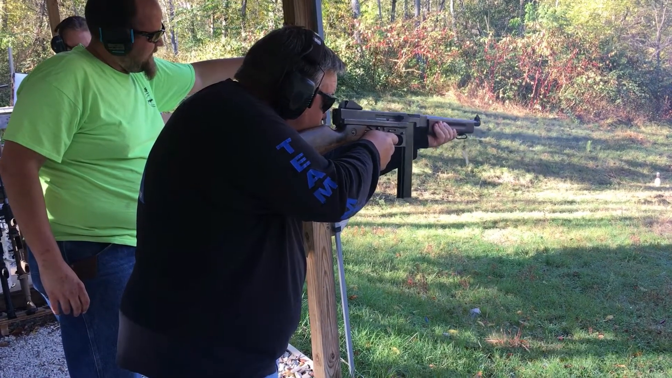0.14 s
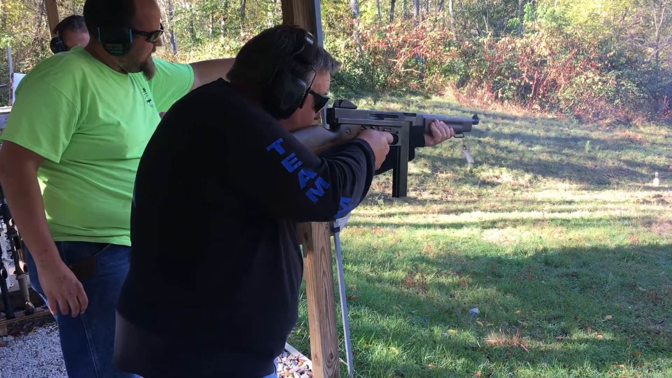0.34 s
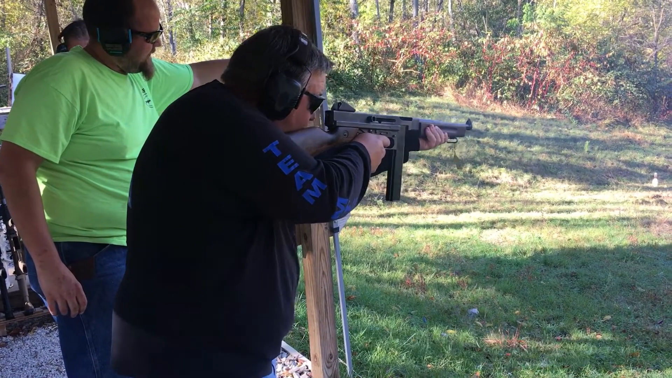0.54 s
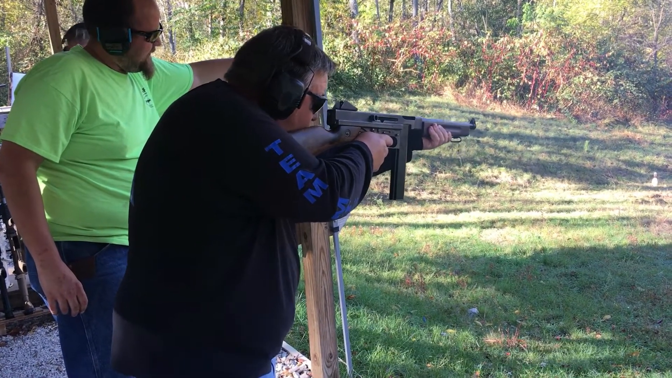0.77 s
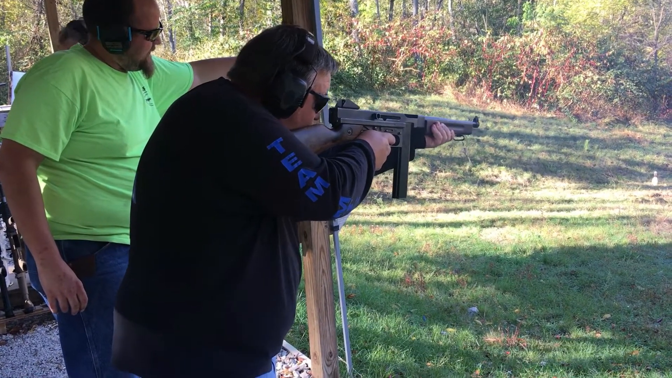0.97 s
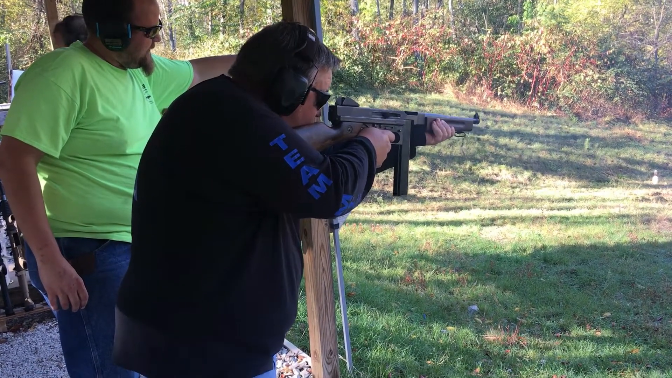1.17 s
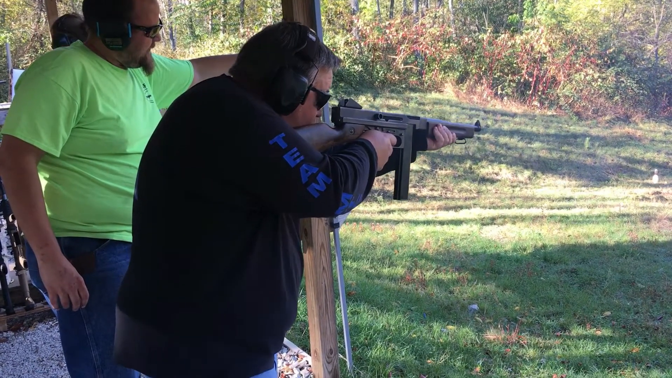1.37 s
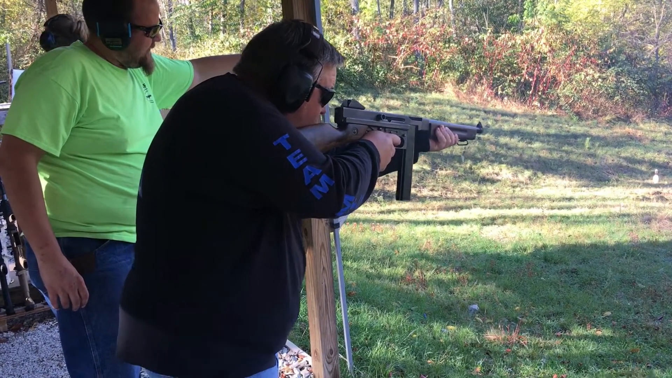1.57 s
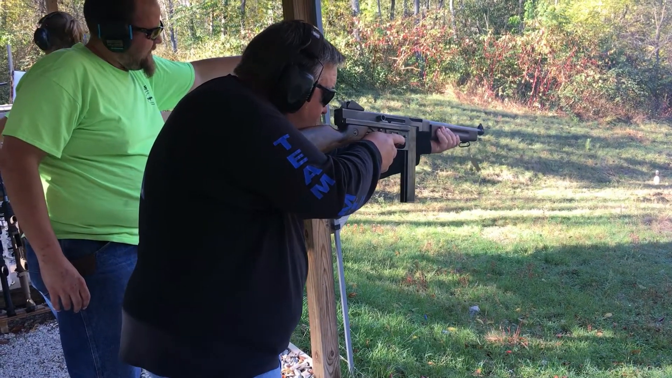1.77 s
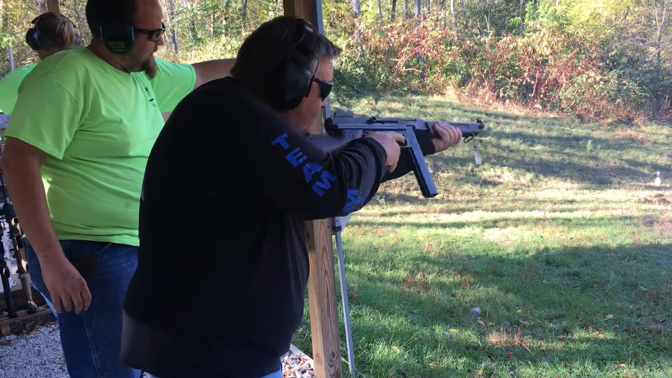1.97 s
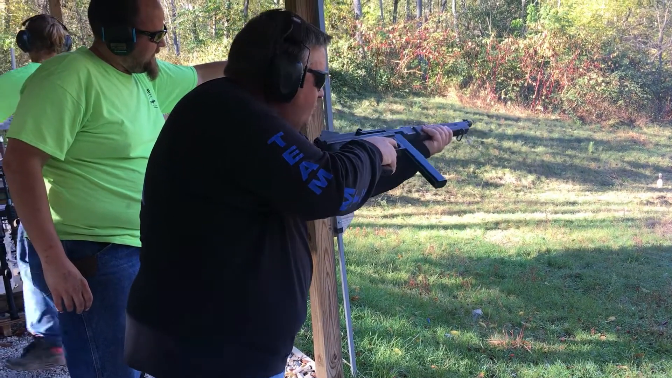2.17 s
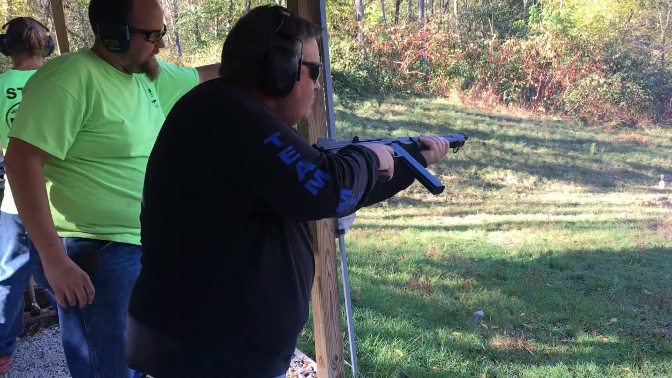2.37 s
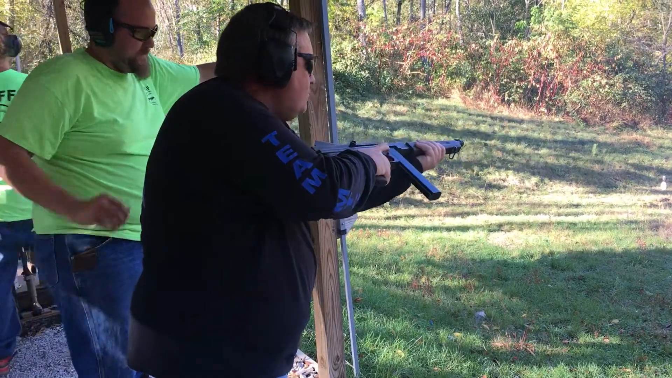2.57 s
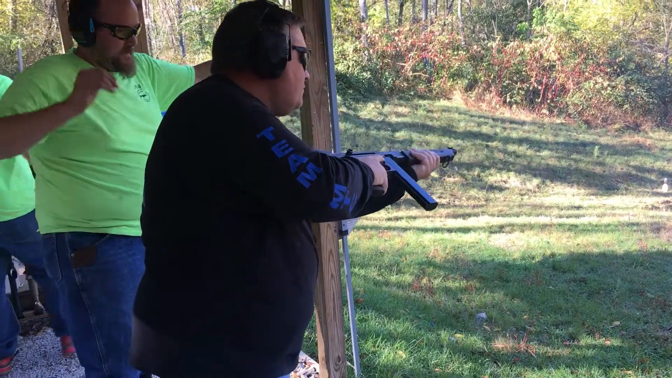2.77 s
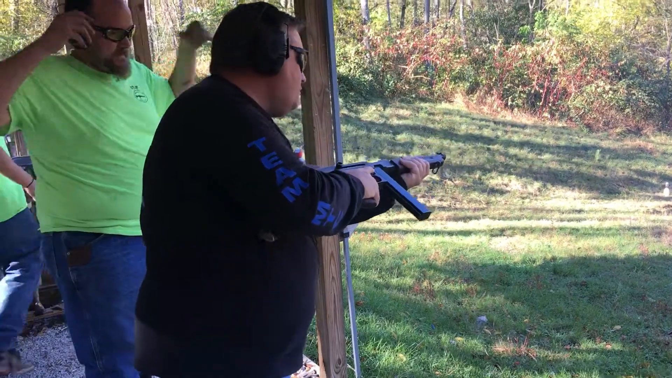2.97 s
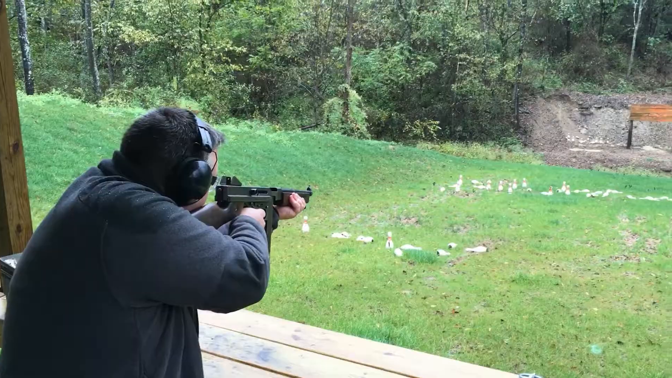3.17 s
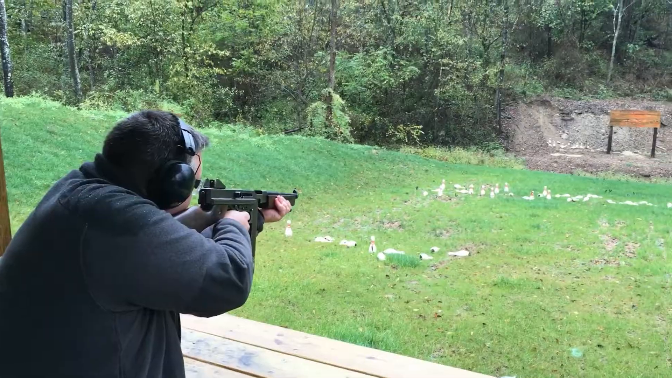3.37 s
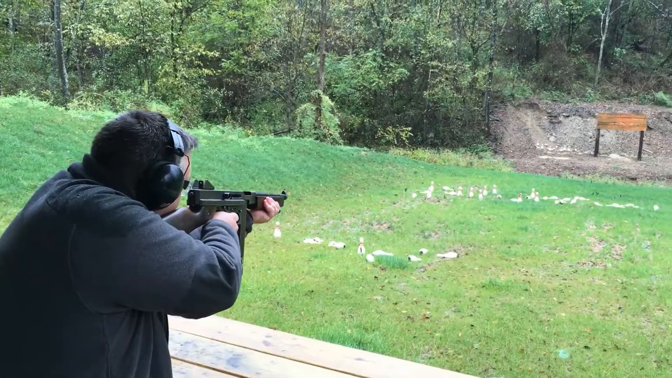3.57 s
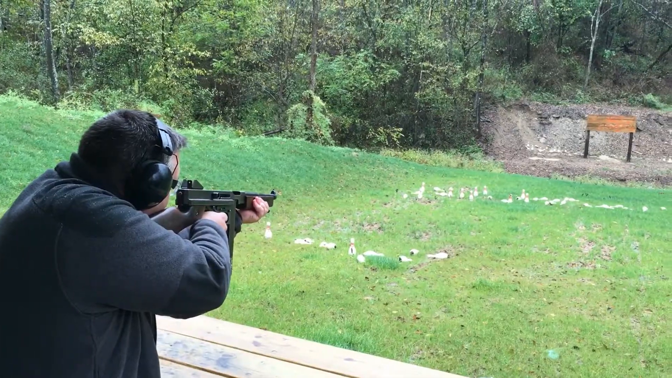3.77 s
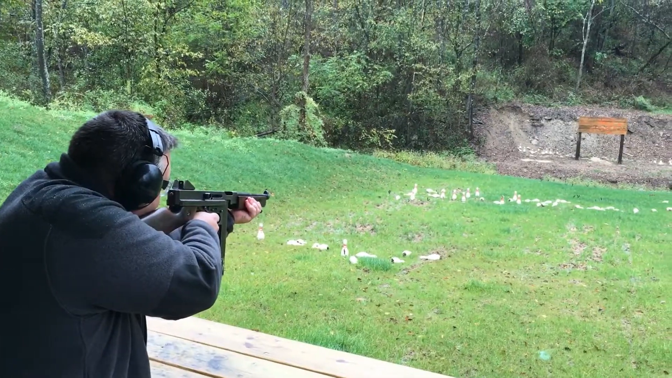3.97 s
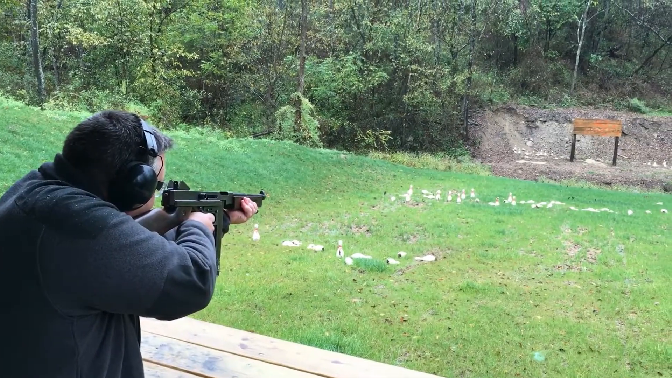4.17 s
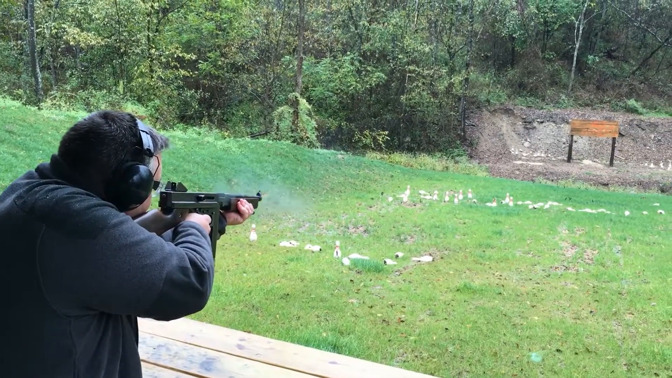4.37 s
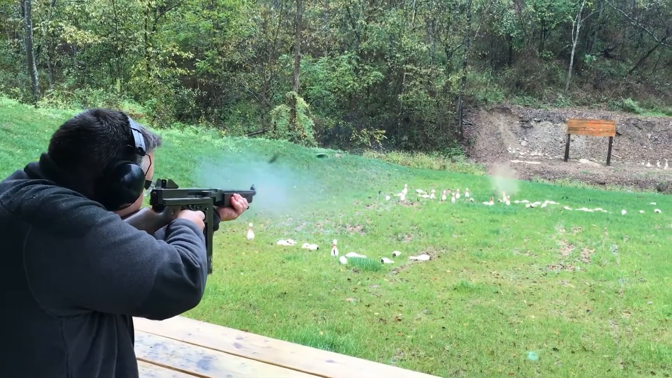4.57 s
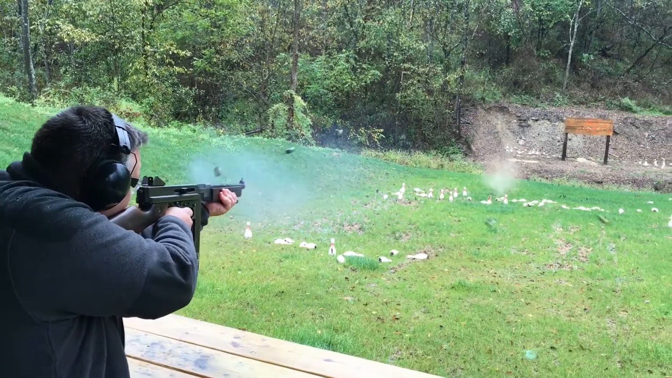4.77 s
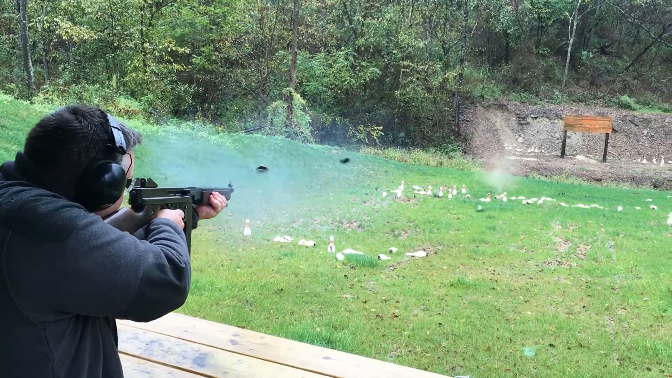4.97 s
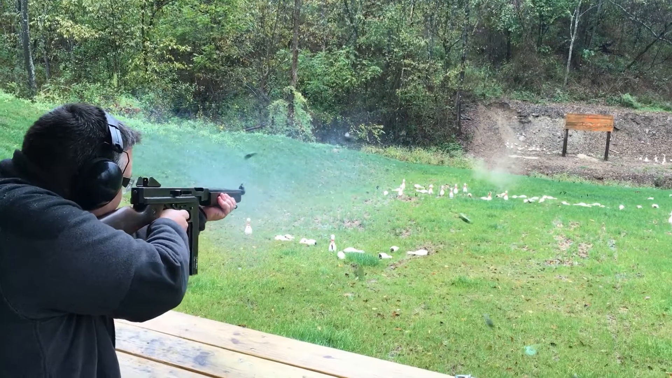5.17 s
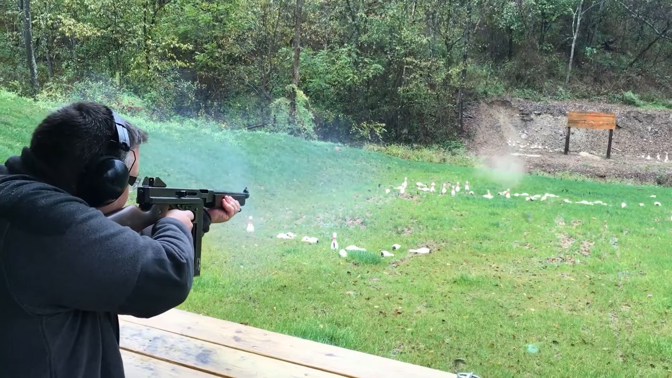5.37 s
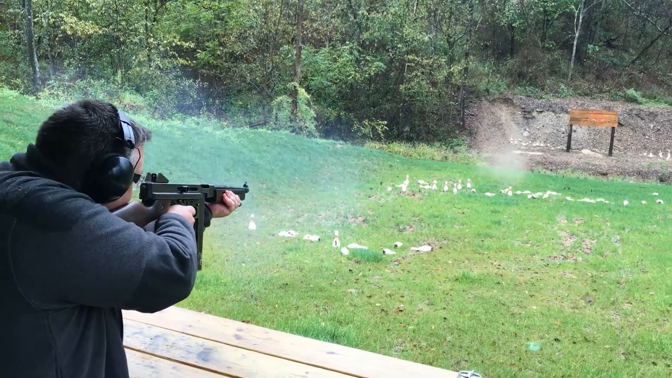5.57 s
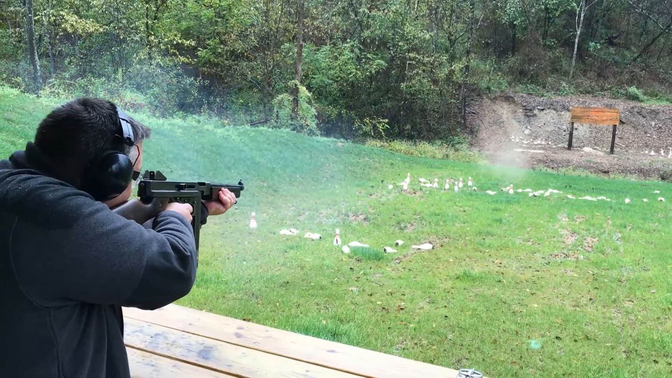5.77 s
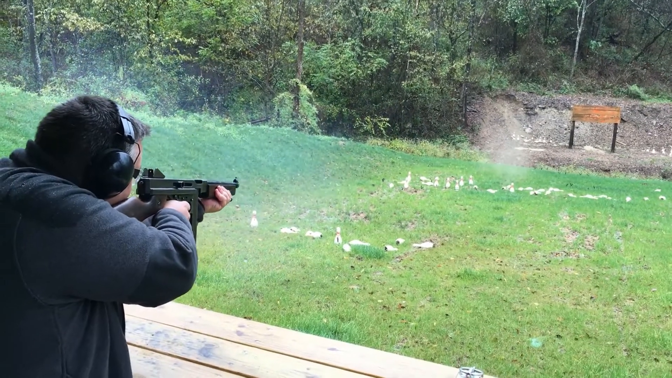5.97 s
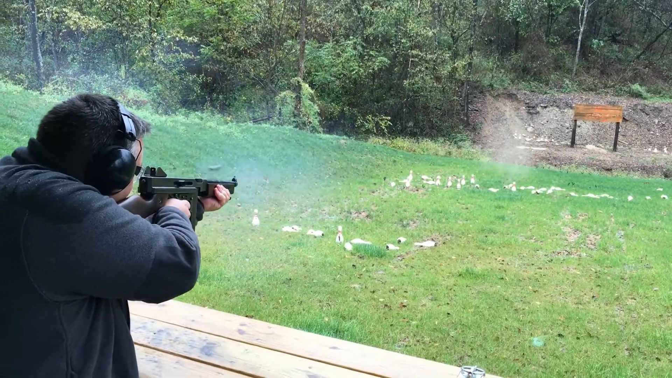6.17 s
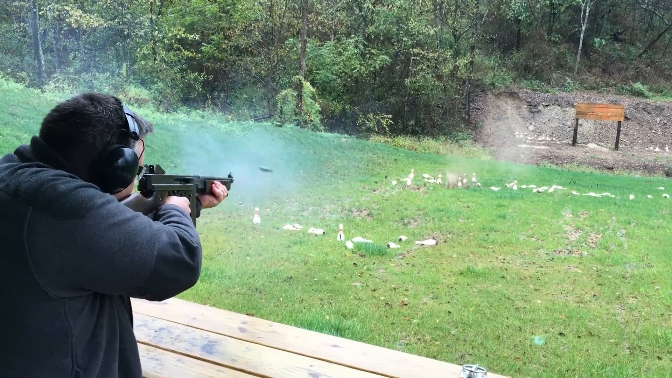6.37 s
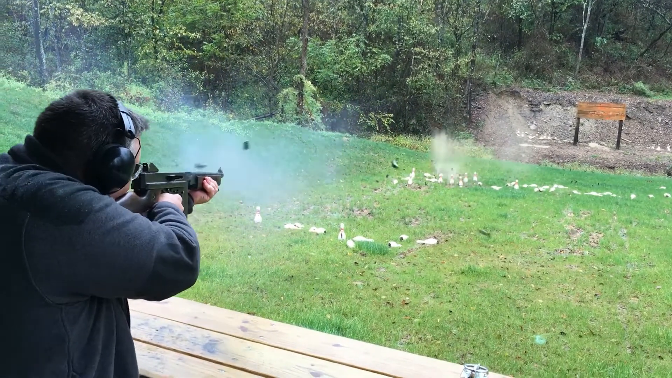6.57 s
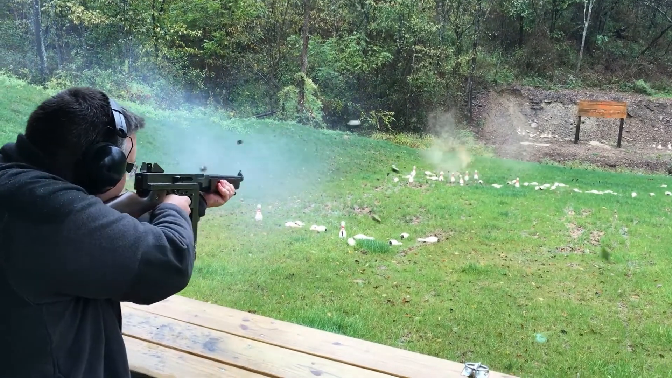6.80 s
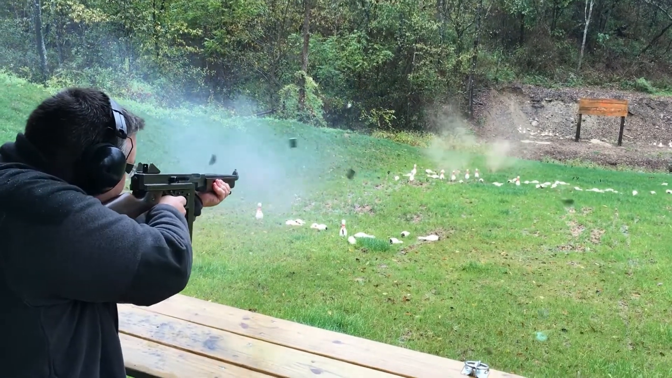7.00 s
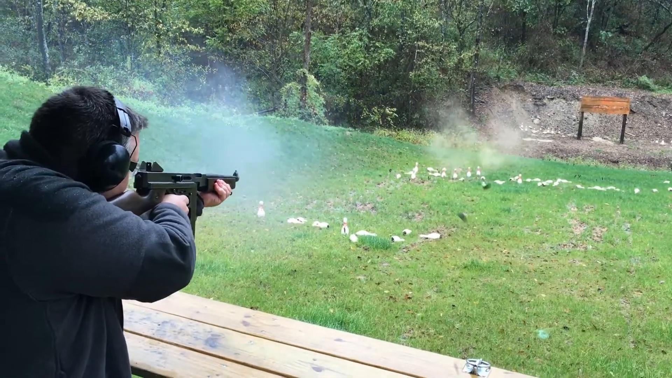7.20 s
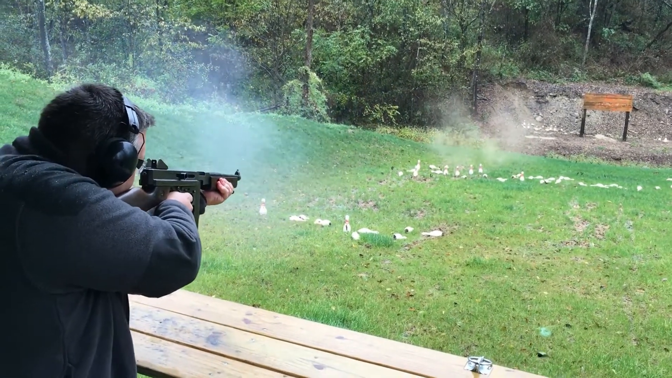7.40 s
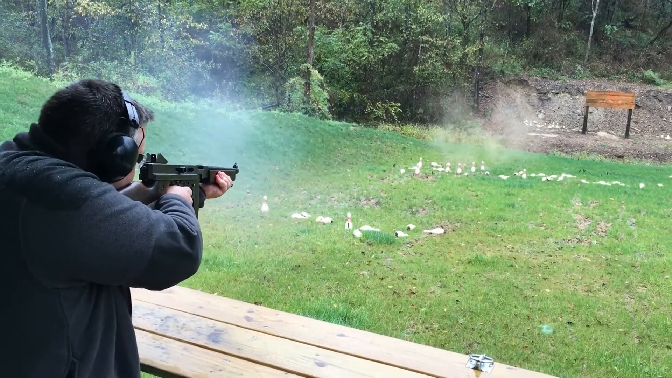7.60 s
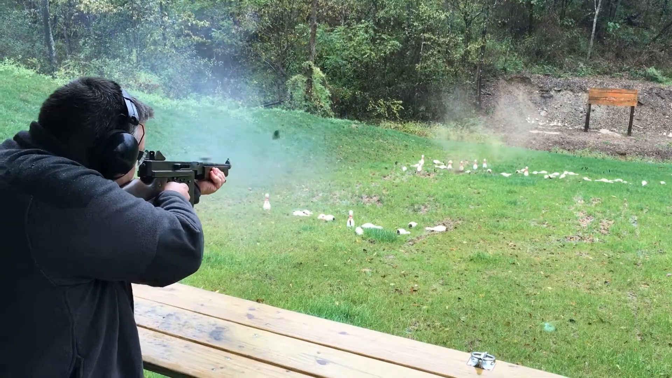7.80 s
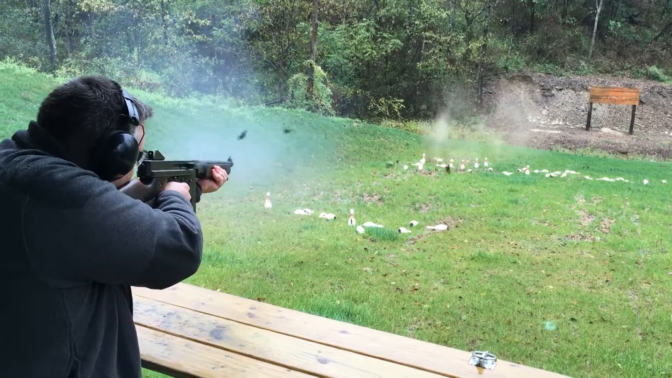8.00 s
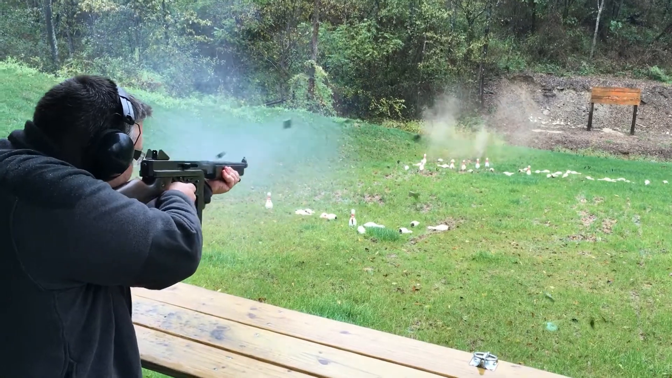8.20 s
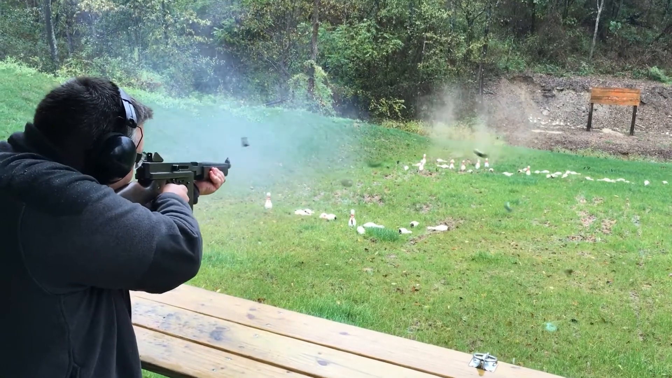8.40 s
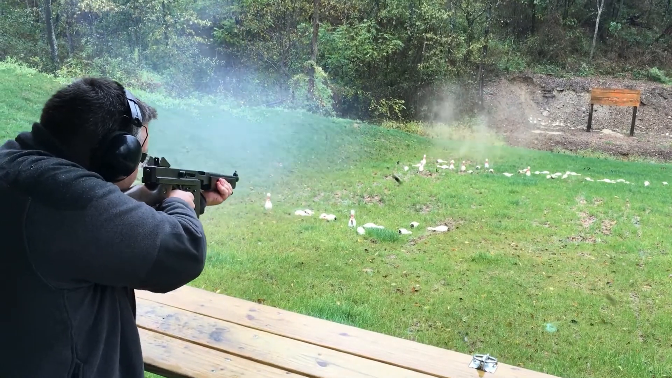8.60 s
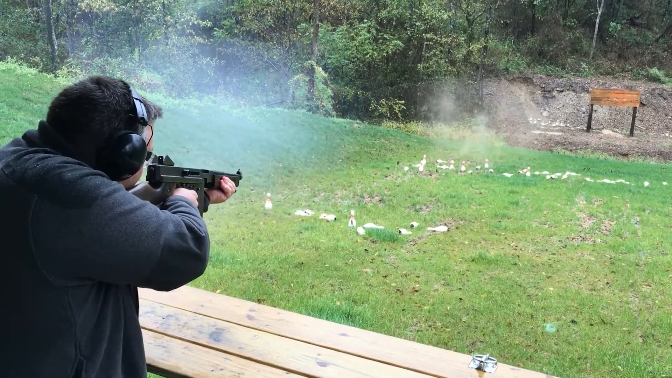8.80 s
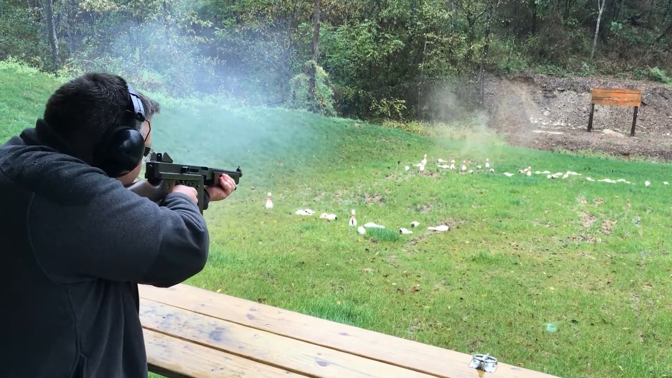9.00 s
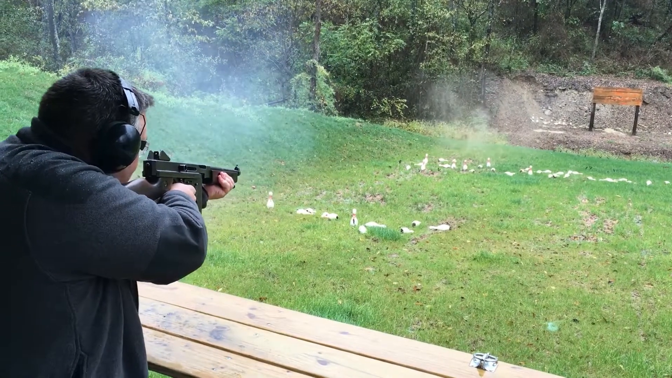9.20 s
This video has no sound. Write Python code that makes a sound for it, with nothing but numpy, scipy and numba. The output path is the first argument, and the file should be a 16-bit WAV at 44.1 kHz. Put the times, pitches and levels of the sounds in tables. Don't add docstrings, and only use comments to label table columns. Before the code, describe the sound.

One distorted, limited microphone hears a submachine gun at two range positions. First a hard, dry short burst and a pair, with spent brass ringing afterwards; then a momentary near-silent cut. Distant guns pop over airy low rumble before three longer, fuller bursts at about thirteen shots a second. Between them the slopes roll back, the air slowly swells up again, and small cases tinkle.

```python
import sys
import numpy as np
from scipy import signal
from scipy.fft import rfft, irfft
from scipy.io import wavfile
from scipy.ndimage import uniform_filter1d
from numba import njit

SR = 44100
rng = np.random.default_rng(int(sys.argv[2]) if len(sys.argv) > 2 else 0)


def file_out(sig):
    cols = np.atleast_2d(sig).T
    lim = np.clip(cols, -1, 1)
    pcm = np.round(lim * 32767).astype(np.int16)
    wavfile.write(sys.argv[1], SR, pcm)


def field_ratio(decibels):
    return 10 ** (np.asarray(decibels, dtype=float) / 20)


N = 407917
BANDS_HZ = 35 * 2 ** np.arange(0, 9, .5)
CUT_S, CUT_FADE_S = 3.198, .05


def on_log(table, hz):
    pitch_hz, value = np.transpose(table)
    return np.interp(np.log(hz), np.log(pitch_hz), value)


def band(x, hz, octaves=0.45):
    f = np.maximum(np.fft.rfftfreq(x.shape[-1], 1 / SR), 1)
    bell = np.exp(-(np.log2(f / hz) / octaves) ** 2)
    return irfft(rfft(x) * bell, x.shape[-1])


def unit(x):
    return x / np.sqrt(np.mean(x ** 2))


def add(out, s, sound):
    i = int(s * SR)
    out[i:i + len(sound)] += sound[:N - i]


def echoes(shape, scatter_db):
    size_db = scatter_db * np.minimum(rng.exponential(size=shape), 4)
    return unit(rng.standard_normal(shape) * field_ratio(size_db))


def walk(rate):
    hold = int(SR / rate)
    steps = np.clip(rng.standard_normal(N // hold + 1), -2, 2)
    stairs = np.repeat(steps, hold)
    return unit(uniform_filter1d(uniform_filter1d(stairs, hold), hold)[:N])


# start_s, end_s, far_slope_answer_after_s, echo_db, presence_db
ECHO_VOLLEYS = [
    (0, 0, .3, -36, -52),
    (.15, .49, .24, -28.5, -38),
    (1.2, 1.32, .25, -29, -39),
    (3.25, 3.26, .07, -37, -36),
    (4.41, 5.2, .24, -26, -34),
    (6.21, 7.08, .24, -25.5, -36),
    (7.78, 8.43, .25, -24, -31.5),
]
ECHO_FADE_DB_PER_S = [11, 10.5, 14.5, 47]
ANSWER_DB = [1, 6.5, 5, 5.5]
FIRING_LIFT_DB = [2, 2, 4, 5]
# body_db, presence_db, top_db, rumble_db, ducked_by_db, gain_returns_s
QUIET_PLACES = [
    (-56, -63, -63, -43, 24, .75),
    (-47, -47.5, -76, -37, 18, 1.3),
]
FIRING_RUMBLE_DB = [-46, -37]
# bottom_db of the echo, heavier in the field
BOTTOM_DB = [-4, 1.5]


def roll_back(s):
    starts, ends, answers, body_db, presence_db = np.transpose(ECHO_VOLLEYS)
    last = np.clip(np.searchsorted(starts, s, side="right") - 1, 0, None)
    since = np.maximum(s - ends[last], 0)
    off = since - answers[last]
    rise_s, fall_s = .055, .17
    swell = np.exp(-(off / np.where(off < 0, rise_s, fall_s)) ** 2)
    start_db = np.array([body_db, body_db, presence_db, presence_db - 8])[:, last]
    echo_db = start_db + np.outer(ANSWER_DB, swell) - np.outer(ECHO_FADE_DB_PER_S, since)
    echo_db += np.outer(FIRING_LIFT_DB, since == 0)
    place = (s > CUT_S).astype(int)
    echo_db[0] += np.array(BOTTOM_DB)[place]
    quiet = np.transpose(QUIET_PLACES)[:, place]
    ours = body_db[last] > -33
    ducked_db = ours * quiet[4] * np.exp(-(since / quiet[5]) ** 2)
    quiet_db = quiet[[0, 0, 1, 2, 3]] - ducked_db
    rumble_fade_s = .14
    shaken = ours * field_ratio(np.array(FIRING_RUMBLE_DB)[place]) * np.exp(-since / rumble_fade_s)
    gains = np.hypot(field_ratio(quiet_db), np.vstack([field_ratio(echo_db), shaken]))
    return uniform_filter1d(20 * np.log10(gains), size=5)


# pitch_hz, level_db_per_hz
SLOPE_COLOUR = [(18, -77), (30, -47), (55, -25), (101, -34.5), (128, -17.5), (200, -17), (282, -0.5),
                (377, -3), (466, 2), (606, -3), (6010, -34.5), (15100, -50.5), (16400, -63)]
# pitch_hz, level_db_per_hz
AIR_COLOUR = [(18, -33), (30, -4.5), (91, -5), (330, -16.5), (466, -29.5), (1080, -17), (2950, -36),
              (7420, -37.5), (15100, -51), (16400, -53)]


def slopes():
    s = np.arange(0, N / SR + .01, .01)
    levels_db = roll_back(s)
    anchors_hz = np.array([260, 550, 2400, 9000])
    widths_db = 10 * np.log10([1800, 980, 2500, 9000])
    lift_db = levels_db[:4].T - widths_db - on_log(SLOPE_COLOUR, anchors_hz.clip(550))
    t, out, roll = np.arange(N) / SR, 0, walk(10)
    air_db = np.interp(t, s, levels_db[4]) - 19
    for hz in BANDS_HZ:
        band_db = [np.interp(np.log(hz), np.log(anchors_hz), row) for row in lift_db]
        echo_db = np.interp(t, s, band_db) + on_log(SLOPE_COLOUR, hz) + .7 * roll - 6 * (hz < 170)
        both = np.hypot(field_ratio(echo_db), field_ratio(air_db + on_log(AIR_COLOUR, hz)))
        gain = both * field_ratio(1.8 * walk(20))
        edges = signal.butter(3, [hz / 1.19, hz * 1.19], "band", fs=SR, output="sos")
        out = out + gain * signal.sosfilt(edges, echoes(N, 0.72))
    ridge = field_ratio(-1) * band(out, 345, octaves=.16)
    return (out + ridge) * field_ratio(41.5)


# start_s, peak_db
CASES = [
    (0.0064, -13),
    (0.935, -31.5),
    (1.0535, -28),
    (2.0644, -22),
    (2.0909, -10),
]
# pitch_hz, level_db, t60_s
CASE_MODES = [
    [(7499, -20, 5.0), (8064, -43, 5.0), (9300, -15, 0.11), (10030, -16, 0.21), (12880, -16, 5.0),
     (15120, -7.5, 0.21), (15540, -18.5, 0.054)],
    [(7101, -7.5, .26), (10950, -2, 0.31), (11600, -11, .13), (15270, -12, .12), (15300, -13, .16)],
    [(7682, -11, .2), (10050, -3, .2), (11490, -14, .15), (13010, -5, .2), (14940, -7, .2)],
    [(7111, -11, 0.052), (11120, -7, 1.9), (11830, -7, 0.041), (13210, -3, 0.075)],
    [(7200, -11, 0.36), (7537, -30, 0.16), (8200, 0.5, 0.092), (10010, -12.5, 0.46), (10730, -24, 0.21),
     (11010, -35, 5.0), (11740, -4.5, 0.12), (12840, -13, 0.68), (14150, -22, 0.16), (14990, -3, 0.28),
     (15630, -25, 0.28)],
]
# start_s, peak_db, low_pitch_hz, high_pitch_hz, high_level_db
TINKS = [(2.2134, -25, 11100, 15100, -15), (2.3955, -33, 10400, 15300, -7), (2.42, -32, 11100, 13200, -2),
         (2.4455, -36, 11100, 15300, -7), (2.5052, -33, 11900, 14800, -19),
         (2.8414, -33, 12200, 14000, -30), (5.3622, -40, 10100, 15200, -23),
         (5.6994, -32, 10000, 13500, -15), (5.8716, -40, 9950, 13500, -14), (5.978, -29, 10050, 15400, -2),
         (7.5148, -38, 10000, 15400, -20), (7.5408, -40, 10100, 15600, -20),
         (7.5732, -48, 9960, 15500, -26), (8.7126, -39, 10100, 15500, -19), (8.8114, -28, 9980, 15500, -16),
         (8.8927, -33, 9750, 15500, -23), (8.951, -26, 10100, 15600, -6), (9.0357, -20, 10960, 15600, 15),
         (9.1127, -49, 10200, 15200, -26)]


def ring(modes, tick_db, longest):
    t = np.arange(16384) / SR
    hz, db, t60 = np.transpose(modes)[:, :, None]
    flutter = field_ratio(4 * unit(band(rng.standard_normal((len(hz), len(t))), 45, octaves=1.7)))
    fade = field_ratio(db - 60 * t / np.clip(t60, .02, longest))
    tones = fade * flutter * np.sin(2 * np.pi * (hz * t + rng.random(hz.shape)))
    grit = field_ratio(-60 * t / .025) + field_ratio(-13 - 60 * t / longest)
    tick = field_ratio(tick_db) * grit * unit(band(echoes(len(t), 1.5), 8100, octaves=2.0))
    return tones.sum(axis=0) / np.sqrt(np.sum(field_ratio(db) ** 2)) + tick


def brass():
    out, tink_t60_s = np.zeros(N), .092
    for (s, db), modes in zip(CASES, CASE_MODES):
        add(out, s, field_ratio(db - 8) * ring(modes, tick_db=-6, longest=0.42))
    for s, db, low_hz, high_hz, high_db in TINKS:
        modes = [(low_hz, -3, tink_t60_s), (high_hz, high_db, tink_t60_s)]
        add(out, s, field_ratio(db - 13.5) * ring(modes, tick_db=-3, longest=0.32))
    return out


# start_s, peak_db, pitch_hz, t60_s
THUMPS = [
    (.134, 4, 480, 0.07),
    (4.40, -9.5, 350, 0.24),
    (4.494, -18, 170, 0.18),
    (4.40, -14, 2700, .06),
    (3.31, -25, 253, .2),
    (6.198, -10, 860, .1),
]


def thumps():
    out, t = np.zeros(N), np.arange(8192) / SR
    for s, db, hz, t60 in THUMPS:
        knock = unit(band(rng.standard_normal(len(t)), hz, octaves=0.18))
        swell = 1 - np.exp(-(t / 0.012) ** 2)
        add(out, s, field_ratio(db - 60 * t / t60) * swell * knock)
    return out


# start_s, peak_db, pitch_hz, treble_db
BOLT = [(0.104, -18, 4270, -21), (0.1296, -11, 1880, -7), (1.145, -36, 947, 4), (1.1687, -28.5, 4060, 5),
        (1.185, -13.5, 1300, -11), (4.356, -18, 1350, -33), (4.3745, -6, 2230, -14), (4.397, -8, 2290, -11),
        (5.1085, -18, 1130, -16), (6.1629, -27, 2010, -6), (6.1904, -11, 1870, -25),
        (7.7009, -34.5, 991, 2), (7.7578, -16.5, 1430, -15)]
# start_s, peak_db, pitch_hz, treble_db
SLAPS = [
    (0.7, -29, 1030, -12),
    (1.5426, -20, 1100, -24),
    (7.1846, -16, 910, -29),
    (7.4615, -21, 1450, -44),
]
# start_s, peak_db, pitch_hz, treble_db
REPORTS = [
    (2.3064, -34.5, 1040, -2),
    (2.4928, -42, 1110, 3),
    (2.6256, -31, 1240, -11),
    (2.9533, -40, 1320, -5),
    (3.255, -17.5, 988, -11),
    (3.3166, -17, 977, -12),
    (3.3444, -18.5, 1900, -17),
    (3.453, -22, 2400, -25),
    (3.5608, -21.5, 1600, -8),
    (3.9391, -22, 1480, -36),
]


def clacks():
    out, t = np.zeros(N), np.arange(8192) / SR
    for rows, t60_s in (BOLT, .1), (SLAPS, .09), (REPORTS, .22):
        for s, db, hz, treble_db in rows:
            swarm = echoes(len(t), 3.7)
            body = unit(band(swarm, hz, octaves=2.02))
            core = 0.67 * unit(band(swarm, hz, octaves=0.23))
            edge = field_ratio(treble_db) * unit(band(swarm, 7500, octaves=1.0))
            shape = (1 - np.exp(-t / 0.003)) * field_ratio(-60 * t / t60_s)
            add(out, s, field_ratio(db - 8.5) * (body + core + edge) * shape)
    return out


def resonate(x, peaks):
    f = np.fft.rfftfreq(x.shape[-1], 1 / SR)
    lift = 1 + sum((field_ratio(db) - 1) / (1 + 2j * (f - hz) / width) for hz, width, db in peaks)
    return unit(irfft(rfft(x) * lift, x.shape[-1]))


def boom(t, roof, swell_s, count):
    hz, _, db = np.transpose(roof)[:, :, None, None]
    phase, level, pitch, pace = rng.standard_normal((count, len(roof), 4)).T[:, :, :, None]
    late = t / (swell_s * field_ratio(2.8 * pace))
    start = 2 * np.pi * rng.random(hz.shape) + .5 * phase
    tone = np.sin(2 * np.pi * hz * (1 + 0.0061 * pitch) * t + start)
    return np.sum(field_ratio(db + 2.8 * level) * late * np.exp(-late ** 1.4) * tone, axis=0)


def gun(shots, colour, t60, roof, drive_db, same, scatter_db, crack_db, late_cycles, hold_s, slap, usual_db, boom_db):
    s, db, treble_db, thump_db = np.transpose(shots)[:, :, None]
    t = np.arange(16384) / SR
    roofed, fresh = echoes(len(t), scatter_db), echoes((len(s), len(t)), scatter_db)
    roofed[20:22] += field_ratio(crack_db) * np.array([1, -1])
    roofed, fresh = resonate(roofed, roof), resonate(fresh, roof)
    after = np.sqrt(t ** 2 + hold_s ** 2) - hold_s
    slap_s, slap_db, slap_width_s = slap
    wall = 1 + field_ratio(slap_db) * np.exp(-((t - slap_s) / slap_width_s) ** 2)
    blast = 0
    for hz in BANDS_HZ:
        tilt_db = (treble_db - usual_db) * (hz > 4500) + thump_db * (hz < 210)
        share = same ** (hz / 1500) ** .5
        swarm = np.sqrt(share) * band(roofed, hz) + np.sqrt(1 - share) * band(fresh, hz)
        grow = 1 - np.exp(-(t / (0.00036 + late_cycles / hz)) ** 2)
        fade = field_ratio(-60 * after / min(on_log(t60, hz), .18))
        blast = blast + field_ratio(on_log(colour, hz) + tilt_db) * swarm * grow * fade * wall
    blast = blast / np.sqrt(np.mean(blast[:, :1024] ** 2))
    ringing = field_ratio(boom_db) * boom(t, roof, swell_s=0.015, count=len(s))
    blast = (blast + ringing) * field_ratio(db + drive_db)
    out = np.zeros(N)
    for k in range(len(s)):
        add(out, s[k, 0] - .0008, blast[k])
    return out


# start_s, level_db, treble_db, thump_db
NEAR_SHOTS = [
    (0.1533, -3.5, -9, -4),
    (0.2267, -6, -7, -2.5),
    (0.2987, -12, -7.5, -3),
    (0.376, -7, -9.5, -3),
    (0.4513, -5.5, -9, -6),
    (1.2048, -3.5, -8, -4),
    (1.2782, -4.5, -9, -6.5),
]
# pitch_hz, level_db_per_hz
NEAR_COLOUR = [(18, -36), (30, -19), (80, 8.5), (190, -4), (387, -21), (710, -9.5), (789, -13.5),
               (1030, -5), (1520, -24), (1740, 3), (2580, -11), (13600, -23), (16400, -28)]
# pitch_hz, t60_s
NEAR_T60 = [(40, 0.11), (150, 0.04), (500, 0.21), (1500, 0.074), (4000, 0.12), (9000, .1), (16000, 0.13)]
# pitch_hz, width_hz, level_db
NEAR_ROOF = [(644, 120, 3), (1520, 30, 6), (1630, 67, 5), (2310, 43, 4.5), (2350, 27, 6.5), (2890, 60, -5),
             (3170, 25, 4), (3860, 34, 0.5)]


def near_gun():
    return gun(NEAR_SHOTS, NEAR_COLOUR, NEAR_T60, NEAR_ROOF, drive_db=1.5, same=0.3, scatter_db=4.0, crack_db=7,
               late_cycles=0.6, hold_s=0.02, slap=(.027, -4, .006), usual_db=-8, boom_db=-25)


# start_s, level_db, treble_db, thump_db
FIELD_SHOTS = [(4.4082, -3.5, -7.5, -7), (4.493, -9, -2, 4), (4.569, -12, -1, 1), (4.6458, -5.5, -7.5, 0),
               (4.7201, -4.5, -7.5, -3), (4.801, -3, -8, -4.5), (4.8815, -3.5, -7.5, -7.5),
               (4.9613, -4.5, -7, -10), (5.0535, -3.5, -8, -1), (5.1602, -2, -8, -4),
               (6.2113, 0, -7.5, -4.5), (6.2894, -4.5, -6.5, 0), (6.3681, -4.5, -6.5, 0.5),
               (6.4464, -2, -9, -4), (6.5197, -3, -6.5, -5), (6.6142, -1, -8, -4.5),
               (6.6939, -0.5, -7.5, -0.5), (6.773, -0.5, -7.5, -10), (6.8537, -2, -6.5, -5),
               (6.9352, -1, -7.5, -1), (7.0425, -1.5, -8.5, -3), (7.7801, -2.5, -7, -1),
               (7.8522, -1.5, -7.5, -2), (7.9299, -1, -7, 1), (8.0079, -1.5, -8, -4),
               (8.088, -1, -8.5, -1.5), (8.1636, -2.5, -7, -5.5), (8.242, -2, -6.5, -4),
               (8.319, -2, -7.5, -2), (8.392, -1.5, -8, -7.5)]
# pitch_hz, level_db_per_hz
FIELD_COLOUR = [(18, -42), (30, -3.5), (106, 1), (158, -8), (367, -6), (606, -6), (810, -15), (924, -5.5),
                (2450, -3.5), (4860, -14), (12900, -22), (15100, -27), (16400, -41)]
# pitch_hz, t60_s
FIELD_T60 = [(40, 0.05), (150, 0.099), (500, .16), (1500, .14), (4000, 0.13), (9000, 0.12), (16000, 0.14)]
# pitch_hz, width_hz, level_db
FIELD_ROOF = [(60.7, 10.6, 0), (230.8, 51, 4), (367, 97, 10), (555, 43, 8.5), (598, 44, 7.5), (729, 27, 4),
              (931.4, 27, 10.5), (1106, 24, 9), (1147, 9.9, 0), (1422, 18, 10.5), (1675, 18, 6),
              (1993, 34, 3.5), (2166, 19, 0.5), (2474, 23, 7)]


def field_gun():
    return gun(FIELD_SHOTS, FIELD_COLOUR, FIELD_T60, FIELD_ROOF, drive_db=-0.5, same=0.66, scatter_db=2.5, crack_db=2,
               late_cycles=0.5, hold_s=0.027, slap=(.024, -8, .006), usual_db=-9.5, boom_db=-16)


def scene():
    from_cut = np.abs(np.arange(N) / SR - CUT_S)
    cut = np.clip(from_cut / CUT_FADE_S, .015, 1) ** 1.5
    mix = slopes() + brass() + thumps() + clacks() + near_gun() + field_gun()
    return np.tile(mix * cut, (2, 1))


@njit
def follow(x, attack, release):
    e, y = 0., np.empty(len(x))
    for i in range(len(x)):
        a = abs(x[i])
        e += (a - e) * (attack if a > e else release)
        y[i] = e
    return y


# start_s, length_s, edge_hz
DROPS = [(0.833, 0.04, 4000), (0.286, 0.012, 4050), (4.46, 0.0047, 1200), (5.096, 0.0043, 1500),
         (1.025, 0.011, 2000), (2.767, 0.011, 2600), (3.044, 0.005, 2200), (3.836, .012, 4000),
         (3.988, 0.012, 4500), (5.289, 0.004, 3560), (5.332, 0.0063, 3070), (5.65, 0.013, 4500),
         (5.838, .02, 3020), (5.95, .02, 3830), (5.99, 0.013, 2230), (6.056, 0.011, 2800),
         (6.10, 0.014, 3500), (6.142, 0.018, 3500), (7.268, 0.007, 2440), (8.977, 0.013, 2500),
         (9.069, 0.036, 2250)]


def starve(x):
    out = x.copy()
    for s, length, hz in DROPS:
        i, size = int((s - .05) * SR), int(.1 * SR)
        piece = x[:, i:i + size]
        treble = piece - signal.sosfiltfilt(signal.butter(8, hz, fs=SR, output="sos"), piece)
        off = np.abs(np.arange(size) / SR - .05) - length / 2
        gate, linger = np.clip(1 - off / .006, 0, 1), np.clip(1 - off / .014, 0, 1)
        lines = rfft(treble * linger)
        stand = np.abs(lines) / uniform_filter1d(np.abs(lines), size=400) ** .7
        lines[stand < np.quantile(stand, .994)] = 0
        frozen = field_ratio(5) * linger * irfft(lines, size)
        out[:, i:i + size] += frozen - .95 * gate * treble
    return out


# start_s, level_db, top_hz
FROZEN = [
    (4.457, -21, 10000),
    (5.095, -21, 3000),
]
FROZEN_HZ = [1300, 1800, 2230, 2770, 5600, 9700]


def whistle():
    out, t = np.zeros(N), np.arange(1536) / SR
    for s, db, top_hz in FROZEN:
        tones = 0
        for hz in FROZEN_HZ:
            if hz < top_hz:
                tones = tones + np.sin(2 * np.pi * (hz * t + rng.random())) * (2000 / hz) ** 0.15
        add(out, s - t[-1] / 2, field_ratio(db) * np.sqrt(np.hanning(len(t))) * tones)
    return out


def top_cut(x):
    return signal.sosfilt(signal.butter(12, 16510, fs=SR, output="sos"), x)


def record(dry):
    attack_s, release_s, ahead = 0.00013, 0.03, 30
    heard = np.roll(follow(dry[0], 1 / (attack_s * SR), 1 / (release_s * SR)), -ahead)
    held = dry / (1 + (heard / .5) ** 3) ** (1 / 6.02)
    held = np.tanh(held / 1.3) * 1.3
    top = signal.ellip(8, .2, 60, 15800, fs=SR, output="sos")
    mix = np.clip(signal.sosfilt(top, starve(held) + whistle()), -1, 1)
    return top_cut(mix)


dry = scene()
out = record(dry)
file_out(out)
```